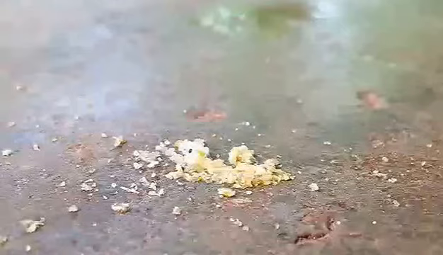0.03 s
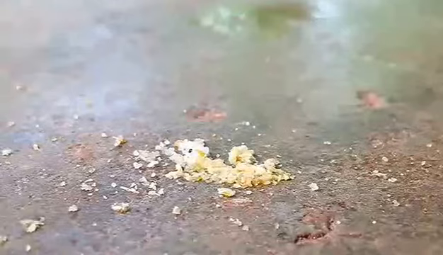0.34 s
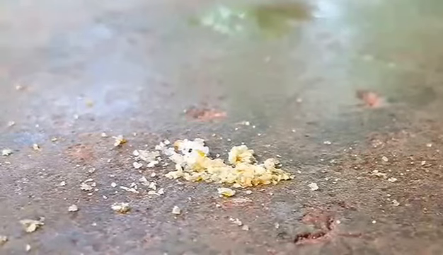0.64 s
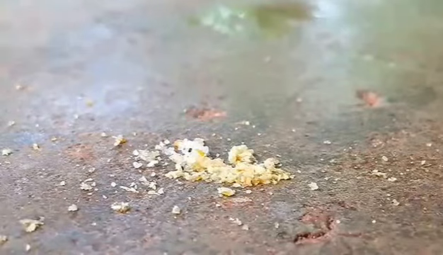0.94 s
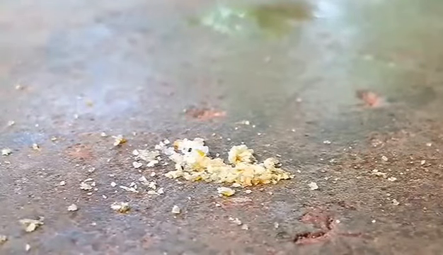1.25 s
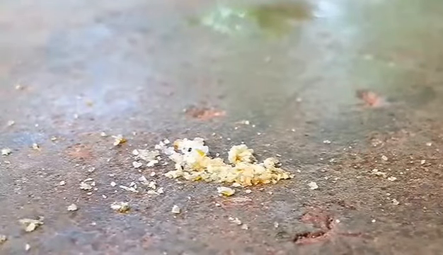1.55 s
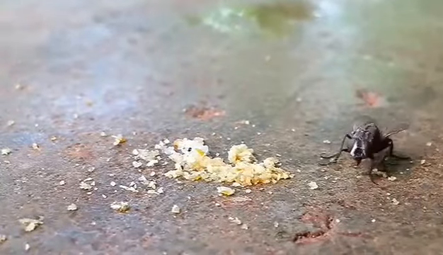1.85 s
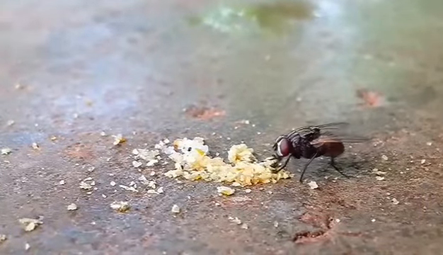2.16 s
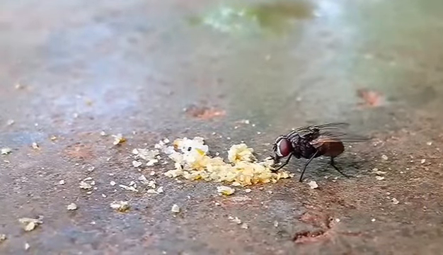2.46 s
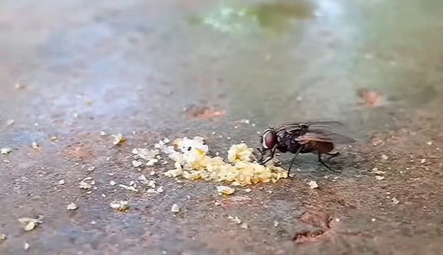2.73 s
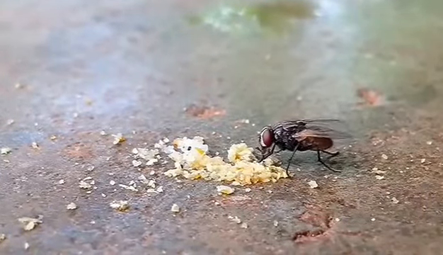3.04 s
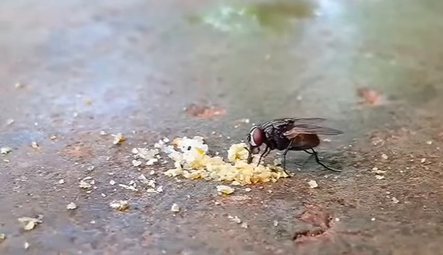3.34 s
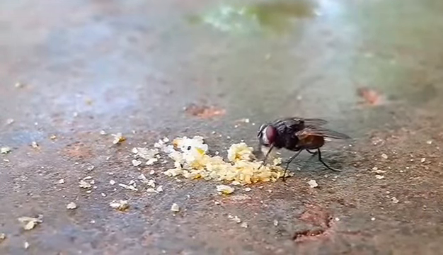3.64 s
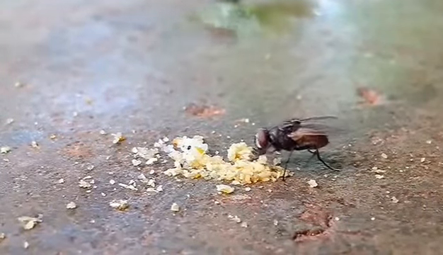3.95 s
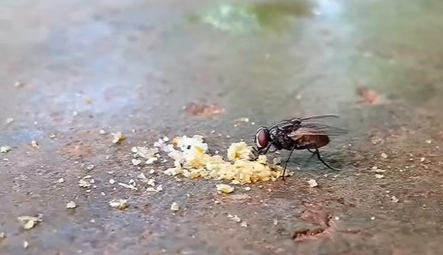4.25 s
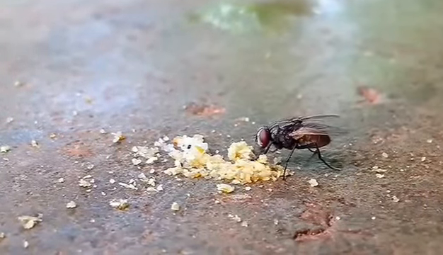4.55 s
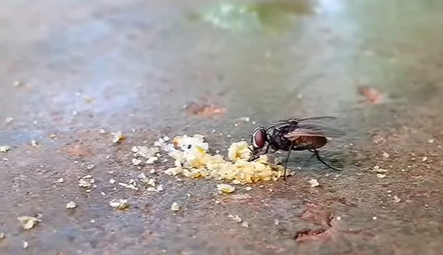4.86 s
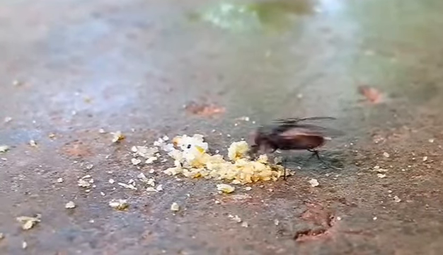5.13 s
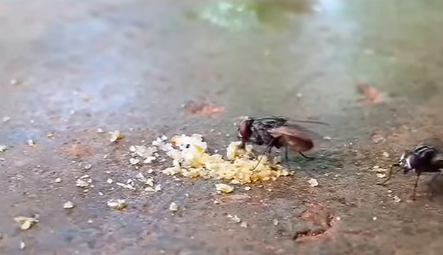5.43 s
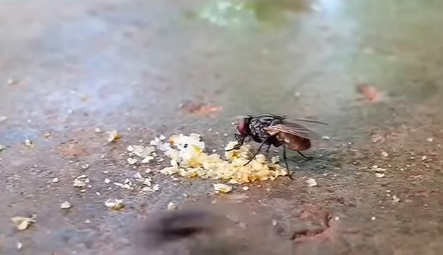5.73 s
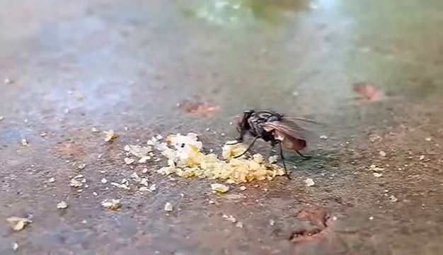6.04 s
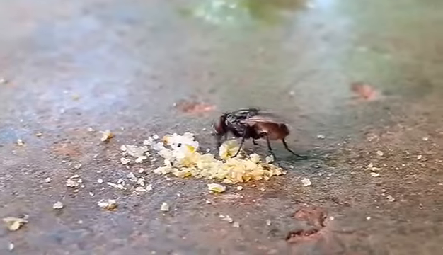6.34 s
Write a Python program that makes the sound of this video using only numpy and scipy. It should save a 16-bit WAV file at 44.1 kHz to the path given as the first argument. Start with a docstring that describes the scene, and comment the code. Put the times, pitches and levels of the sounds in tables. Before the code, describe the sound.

A housefly buzzes very close in short, uneven bursts, darting between left and right over soft room hiss.

```python
"""A quiet room, a stereo microphone very close to some crumbs. Over room air and hiss, a housefly swings
from side to side in short darts: its wing beat gives a hum with buzzing overtones, and each stroke
reversal a rasp. At 3.3 s it brushes past the right port, its downwash puffs on it, and it wanders off.
At 4.6 s it returns briefly as a low drone comes in far behind. The fly leaves, the drone fades, and a
few faint ticks and a rustle are left in the room air."""
import sys
import numpy as np
from scipy import signal
from scipy.fft import rfft, irfft, next_fast_len
from scipy.io import wavfile
from scipy.ndimage import uniform_filter1d, map_coordinates

SR = 44100
rng = np.random.default_rng(int(sys.argv[2]) if len(sys.argv) > 2 else 0)


def generate_wav(signal):
    """Clip the signal to [-1, 1] and save it as 16-bit WAV at the path in sys.argv[1]."""
    frames = np.transpose(np.atleast_2d(signal))
    scaled = np.clip(frames, -1, 1) * 32767
    pcm = np.round(scaled).astype(np.int16)
    wavfile.write(sys.argv[1], SR, pcm)


N = 290619

# bursts of wing effort, each lasting until the next: (start [s], approach [s], retreat [dB/s],
# closest buzz [dB], hum over buzz [dB], rasp over buzz [dB], wing beat [Hz], sag [Hz/s])
FLY_DARTS = [(.222, 0.0038, 24, -29, -12.5, -9.5, 238.6, 131),
             (0.285, 0.044, 258, -17.5, -1.5, -16.5, 243.7, 273.5),
             (.392, 0.011, 117, -32.5, 5, -23, 231.9, 128.5), (.5, 0.064, 8, -32, -7, -8.5, 220.3, 22),
             (0.561, 0.019, 35, -26, -16, -9, 235.4, 31.5), (0.714, 0.026, 240, -23, -3.5, -11, 249, 256.5),
             (0.786, 0.06, 8, -24.5, -3.5, -11.5, 242.4, 202),
             (0.833, 0.052, 400, -21, 2.5, -14, 230.4, 130), (0.895, 0.027, 82, -30, 2, -11, 230.5, 110.5),
             (1.013, 0.076, 106, -29.5, 1.5, -10.5, 226.5, 7),
             (1.132, 0.018, 121, -30, -8.5, -6, 218.1, 81), (1.257, 0.028, 136, -42, 4.5, -10, 235.1, -280),
             (1.331, 0.0047, -39, -38.5, -1.5, -15, 239.1, 100.5),
             (1.462, 0.036, 67, -29.5, -1, -10, 220.4, 235.5),
             (1.536, 0.0086, 113, -30, -5.5, -9.5, 214.5, -300),
             (1.577, 0.013, 304, -27.5, 4.5, -17, 246.4, -105),
             (1.629, 0.012, 40, -27, -6.5, -9.5, 241.9, 336),
             (1.672, 0.029, 245, -22.5, -4, -12, 242.6, 64.5),
             (1.73, 0.0059, 52, -33, -1, -4.5, 239.2, 197), (1.78, 0.018, 55, -26, -15.5, -9.5, 237.3, 62),
             (1.969, 0.0075, 156, -33.5, 5, -8.5, 222.2, 60),
             (2.018, 0.092, 232, -32.5, -7.5, -6.5, 216, 72),
             (2.128, 0.026, 144, -27.5, -6, -9, 221.6, -53.5),
             (2.22, 0.0036, 63, -32.5, -10, -9, 221.5, 199.5),
             (2.303, .007, 137, -35, -8.5, -11, 234.4, 168),
             (2.392, 0.029, 96, -40, 3.5, -16, 215.8, 348.5),
             (2.459, 0.022, 51, -32.5, -7.5, -9, 205.7, 140.5),
             (2.539, 0.024, 106, -28, -14, -9, 230.8, 203),
             (2.645, 0.011, 161, -32.5, -14.5, -8, 212.2, 239.5),
             (2.688, 0.004, 115, -39, -15, -7.5, 217.5, 100.5),
             (2.76, .021, 15, -39.5, -10.5, -11, 220.3, -18.5),
             (2.936, 0.0031, 49, -38.5, -19.5, -11, 236.7, 212),
             (3.174, 0.028, 17, -34.5, -5, -9, 222.8, 333.5),
             (3.229, 0.037, 35, -25, -3.5, -10.5, 217.8, -270),
             (3.284, 0.012, 200, -18, -0.5, -12, 244.3, -200),
             (3.313, 0.0036, 182, -25, 0, -8, 256.1, 471.5), (3.42, 0.01, 58, -41.5, -9, -6, 212.6, 160.5),
             (3.477, 0.0068, 93, -43, -24, -8, 241.4, 381.5), (3.58, .02, 3, -57.5, -24, -1.5, 213.8, 35),
             (4.598, 0.006, 65, -33, -9, -6.5, 237.5, 58.5), (4.723, 0.02, 8, -28.5, -2, -15, 231.7, -60),
             (4.755, 0.028, 171, -23.5, -1.5, -12.5, 239.9, 43), (4.822, 0.005, 150, -32, 8, -13, 234, 138),
             (4.875, 0.0057, 281, -35.5, 1, -8.5, 248.4, 400)]
# turning points of the fly's swing across the microphone: (time [s], left minus right [dB])
FLY_BEARING = [(.25, -12.5), (.32, -28), (.57, 29), (.74, 31), (.87, -49), (1.11, 30), (1.48, -26),
               (1.66, 15), (1.84, 20), (1.97, -15), (2.16, 36), (2.55, -28), (3.28, -48), (4.6, -26),
               (4.79, -30), (4.96, 10)]
# overtones of the wing stroke: (frequency [Hz], relative level [dB])
BUZZ_SPECTRUM = [(450, 8), (680, -3), (900, -0.5), (1150, -3), (1380, -5.5), (1850, -13), (2300, -19),
                 (3000, -28)]
# air torn at the wing edges: (frequency [Hz], relative density [dB])
RASP_SPECTRUM = [(60, -32), (300, -2), (1000, 0), (1700, 2.5), (2400, 1.2), (3600, -3.8), (5600, 0.1),
                 (7800, -4.5), (11000, -4), (13500, -6), (15000, -15)]
# the wing tone dips for a moment while the rasp goes on: (time [s], length [s])
WING_STALLS = [(0.456, .014), (1.0, 0.0041), (1.76, 0.0085), (2.116, 0.0068), (2.201, 0.0089),
               (2.75, 0.0098), (4.858, 0.0061)]
# downwash reaching the ports: (time [s], level [dB], length [s], left minus right [dB])
DOWNWASH_PUFFS = [(3.313, -27.5, 0.017, -10.5)]
# wings zipping past a port, then small dry ticks and rustles:
# (time [s], level [dB], rise [s], centre [Hz], left minus right [dB])
ZIPS_AND_TICKS = [(.596, -35, .02, 2000, 22), (0.898, -35, 0.011, 5700, -23),
                  (3.296, -25, 0.004, 1300, -29), (3.305, -19, 0.0004, 8705, -30),
                  (5.257, -49, 0.005, 4500, -10), (5.343, -49.5, 0.005, 2200, 3),
                  (5.628, -49.5, 0.018, 3300, 23), (6.164, -48, 0.003, 5000, 22)]
# room air: (time [s], hiss [dB], low rush [dB])
AIR_LEVELS = [(.2, -100, -110), (.225, -47.5, -49.5), (4.55, -51.5, -63.5), (4.65, -49.5, -47.5),
              (5.6, -49.5, -56.5), (5.85, -49, -54), (6.1, -51, -58.5)]
# colour of the hiss: (frequency [Hz], relative density [dB])
HISS_SPECTRUM = [(40, -12), (500, -5), (900, -9), (2400, -17.5), (6000, -19), (13500, -20.5), (15000, -32)]
# distant low drone: (time [s], level [dB])
DRONE_LEVELS = [(4.57, -130), (4.61, -52), (5.2, -53), (5.45, -63), (5.7, -130)]

APPROACH_DB, APPROACH_CURVE = 6, 2.3  # rise from a dart's start to its closest point, steepest at first
HUM_REACH, RASP_REACH = 1, 0.88  # dB of hum and of rasp for each dB of buzz as the distance changes
TURN_DIP_DB, TURN_S = 15, .0033  # the hum drops out briefly as the fly turns into a new dart
BRAKE_DB, BRAKE_S = 6.5, .005  # hum and buzz ease off just before the next dart
DART_UNREST, SETTLE_S = 1.3, .045  # extra waver of the wing beat as a dart begins, and its settling time
PICKUP_S = .004  # time the wings take to change from one dart to the next
SLOWEST_HZ = 181  # the wing beat never sags below this
REVERSAL_RAD = 3.8  # the wings flip this far into the beat after the main pressure pulse
DART_RASP_DB_PER_HZ = 0.187  # extra rasp when the wing beat jumps
STALL_DB = 8
PORT_LAG_S = 0.00022  # the far port hears the fly up to this much later
NEARNESS_SHARE = 0.43  # share of the level swings that comes from nearness and never reaches the room
USUAL_BUZZ_DB = -30
TOP_HZ = 15100


def fly():
    """The fly, right at the microphone: hum, buzz and rasp all follow one slightly unsteady wing beat."""
    beat_hz, buzz_db, hum_db, rasp_db, unrest = flight()
    lean_db, = curves(FLY_BEARING)
    waver = unrest * (.007 * wobble(30) + .008 * wobble(70) + .004 * wobble(200))
    lag_s = PORT_LAG_S * np.tanh(lean_db / 10) * np.array([[-.5], [.5]])
    phase = 2 * np.pi * (np.cumsum(beat_hz * (1 + waver)) / SR - beat_hz * lag_s)
    # each port sees another side of the fly, so each gets its own phase and mix of partials
    drift = .5 * np.array([wobble(14), wobble(14)])
    hum = -np.sqrt(2) * np.cos(phase + drift) * amp(hum_db + 1.8 * wobble(45))
    buzz = wing_buzz(phase, beat_hz, hum_db, sway=.9, turn_rate=36, dulling=.38)
    # a dart speeds the wings up and tears the air harder for a moment
    speeding = np.maximum(np.diff(beat_hz, prepend=beat_hz[0]), 0)
    dart_db = DART_RASP_DB_PER_HZ * signal.lfilter([1], [1, -np.exp(-1 / (0.003 * SR))], speeding)
    tearing = wing_rasp(phase - REVERSAL_RAD, snap=7, upstroke=.45, steady=.2, uneven_db=2.2)
    rasp = amp(rasp_db + dart_db) * tearing
    # no two strokes are quite alike, least of all when the downwash hits a port
    buffeted = sum(swell(s, 2 * length) for s, _, length, _ in DOWNWASH_PUFFS)
    flutter_db = 1.1 * wobble(100) + 1.8 * buffeted * wobble(600)
    stall_db = -STALL_DB * sum(swell(s, length) for s, length in WING_STALLS)
    airborne = np.clip((clock() - FLY_DARTS[0][0]) / .004, 0, 1)
    wings = amp(stall_db) * (hum + buzz) + rasp
    return airborne * amp(buzz_db + flutter_db) * pan(lean_db) * wings


def flight():
    """Each dart swells as the fly nears and fades as it leaves; its wing beat jumps, then mostly sags."""
    darts = np.array(FLY_DARTS)
    current = np.maximum(np.searchsorted(darts[:, 0], clock(), side="right") - 1, 0)
    start, approach, retreat, buzz_db, hum_db, rasp_db, beat_hz, sag = darts[current].T
    age = np.maximum(clock() - start, 0)
    remaining = np.append(darts[1:, 0], np.inf)[current] - clock()
    nearing_db = -APPROACH_DB * np.abs(1 - age / approach) ** APPROACH_CURVE
    leaving_db = -retreat * (age - approach)
    near_db = np.maximum(np.where(age < approach, nearing_db, leaving_db), -60)
    turn_db = -TURN_DIP_DB * np.exp(-age / TURN_S)
    brake_db = -BRAKE_DB * np.exp(-remaining / BRAKE_S)
    unrest = 1 + DART_UNREST * np.exp(-age / SETTLE_S)
    controls = [np.maximum(beat_hz - sag * age, SLOWEST_HZ),
                buzz_db + near_db + brake_db,
                hum_db + turn_db + (HUM_REACH - 1) * near_db,
                rasp_db - brake_db + (RASP_REACH - 1) * near_db,
                unrest]
    return uniform_filter1d(np.array(controls), int(PICKUP_S * SR) + 1, axis=1)


def wing_buzz(phase, beat_hz, hum_db, sway, turn_rate, dulling):
    """Each stroke's pressure pulse; the wings interfere, so partials fade and slip as the fly turns."""
    buzz, power = np.zeros((2, 2, N))
    turning = lambda: np.array([wobble(turn_rate), wobble(turn_rate)])
    for k in range(2, 13):
        beaming = sway * (1 - np.exp((1 - k) / 2))  # higher partials are beamed more narrowly
        # face-on strokes sound round, edge-on ones nasal
        partial_db = along(BUZZ_SPECTRUM, k * beat_hz) - dulling * hum_db * np.log(k / 2)
        size = amp(partial_db) / np.sqrt(1 + 2 * beaming ** 2)
        direct = size * (1 + beaming * turning())
        crossed = size * beaming * turning()
        angle = k * (phase - REVERSAL_RAD * (k > 4))  # the high partials come from the flip of the wing
        buzz -= direct * np.cos(angle) + crossed * np.sin(angle)
        power += (direct ** 2 + crossed ** 2) / 2
    return buzz / np.sqrt(power)  # turning changes the colour, not the loudness


def wing_rasp(phase, snap, upstroke, steady, uneven_db):
    """Air tears as the downstroke ends, more weakly as the upstroke ends, and dies within the beat."""
    beats = phase / (2 * np.pi)
    sizes = amp(uneven_db * rng.standard_normal(N))[beats.astype(int)]
    burst = lambda position: np.exp(-snap * (position % 1))
    envelope = steady + sizes * (burst(beats) + upstroke * burst(beats + .5))
    torn = envelope * rng.standard_normal((2, N))
    return unit(filtered(torn, lambda hz: amp(along(RASP_SPECTRUM, hz))))


def downwash():
    """A short low gust on the microphone as the wings pass right by a port."""
    gust = noise([(30, -20), (140, -1), (400, -6), (2500, -28)])
    return gust * sum(amp(db) * swell(s, length) * pan(lean) for s, db, length, lean in DOWNWASH_PUFFS)


def zips_and_ticks(width_octaves=0.55):
    """Close wing zips, faint ticks and a rustle: each is a burst of noise around its own pitch."""
    out, size = np.zeros((2, N)), SR // 2
    hz = np.fft.rfftfreq(size, 1 / SR)
    for s, db, rise, centre, lean in ZIPS_AND_TICKS:
        band = 1 / (1 + (np.log2((hz + 1) / centre) / width_octaves) ** 2)
        burst = unit(irfft(rfft(rng.standard_normal(size)) * band, size))
        out += amp(db) * flick(s, rise) * pan(lean) * np.resize(burst, N)
    return out


def room(x, t60, dull_hz):
    """A small room's short answer, different at each port."""
    t = np.arange(SR // 2) / SR
    tail = rng.standard_normal((2, len(t))) * amp(-60 * t / t60) * (1 - np.exp(-t / 0.0031))
    softened = filtered(x.sum(0), lambda hz: 1 / np.hypot(1, hz / dull_hz))
    return signal.fftconvolve(softened[None], tail / np.linalg.norm(tail[0]), axes=1)[:, :N]


def room_air():
    """Room tone: hiss and a low rush, a little stronger on the right."""
    hiss_db, rush_db = curves(AIR_LEVELS)
    hiss = noise(HISS_SPECTRUM)
    hiss = unit(hiss + 0.21 * hiss[::-1])  # the two ports share some of it
    hiss *= amp(hiss_db + wobble(26))
    rush = noise([(30, -10), (150, -3), (700, -2.5), (2000, -26), (9000, -43)])
    rush *= amp(rush_db + wobble(9))
    return (hiss + rush) * pan(-1.6)


def drone():
    """Off to the right, two low harmonics waver briefly like a far engine."""
    level_db, = curves(DRONE_LEVELS)
    phase = 2 * np.pi * np.cumsum(45.3 + 0.3317 * wobble(9.1)) / SR
    return np.sqrt(2) * amp(level_db) * (np.sin(2 * phase) + 0.4 * np.sin(3 * phase)) * pan(-18)


def amp(db):
    return 10 ** (np.asarray(db) / 20)


def unit(x):
    return x / np.sqrt(np.mean(x ** 2) + 1e-20)


def clock():
    """The time of each sample."""
    return np.arange(N) / SR


def along(points, hz):
    """Reads (frequency [Hz], value) points on a log axis."""
    frequencies, values = np.transpose(points)
    return np.interp(np.log(hz + 1), np.log(frequencies + 1), values)


def curves(rows):
    """One value per sample for each column after the time."""
    times, *columns = np.transpose(rows)
    return [np.interp(clock(), times, column) for column in columns]


def wobble(rate):
    """A smooth random curve, rate knots a second."""
    coarse = np.linspace(0, N / SR, 2048)
    smooth = map_coordinates(rng.standard_normal(2048), [coarse * rate], mode="wrap")
    return np.interp(clock(), coarse, smooth)


def filtered(x, response):
    """x shaped by a gain that depends on frequency."""
    size = next_fast_len(N + SR // 2)
    return irfft(rfft(x, size) * response(np.fft.rfftfreq(size, 1 / SR)), size)[..., :N]


def noise(colour):
    """Two unrelated noises of rms 1, coloured by (frequency [Hz], relative density [dB]) points."""
    return unit(filtered(rng.standard_normal((2, N)), lambda hz: amp(along(colour, hz))))


def pan(lean_db):
    """Left and right gains that share unit power; positive leans left."""
    ratio = amp(np.atleast_1d(lean_db))
    return np.array([ratio, np.ones_like(ratio)]) / np.sqrt(1 + ratio ** 2)


def swell(s, length):
    """A bell-shaped envelope around time s."""
    return np.exp(-np.minimum(((clock() - s) / length) ** 2, 100) / 2)


def flick(s, rise):
    """An envelope that rises quickly to its peak at time s and dies more slowly."""
    progress = np.clip((clock() - s) / rise + 1, 0, 20)
    return progress * np.exp(1 - progress)


def scene():
    """The room answers the fly about equally near and far, so the closest passes sound driest."""
    wings = fly()
    buzz_db = flight()[1]
    radiated = wings * amp(-NEARNESS_SHARE * (buzz_db - USUAL_BUZZ_DB))
    reverb = amp(-19.5) * room(radiated, t60=0.59, dull_hz=6000)
    return wings + reverb + downwash() + zips_and_ticks() + room_air() + drone()


def record(dry):
    """The recorder keeps nothing above its band limit."""
    return filtered(dry, lambda hz: hz < TOP_HZ)


dry = scene()
out = record(dry)
generate_wav(out)
```